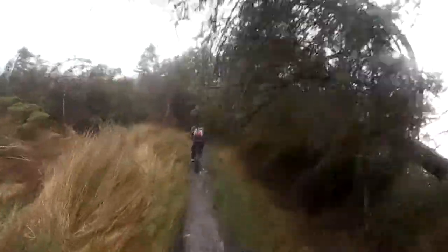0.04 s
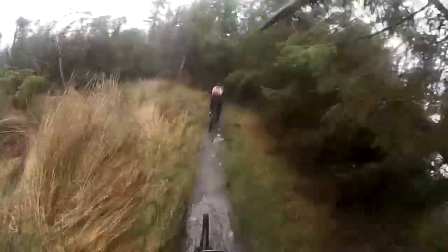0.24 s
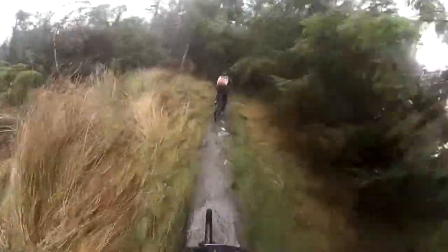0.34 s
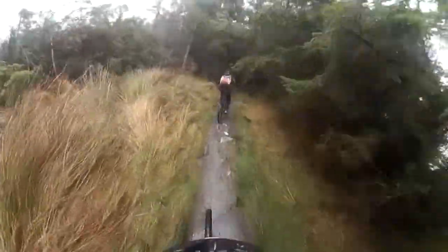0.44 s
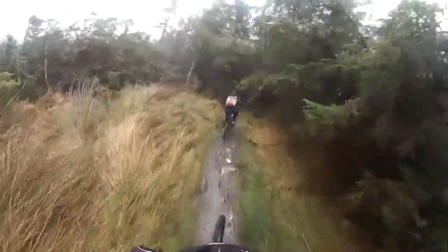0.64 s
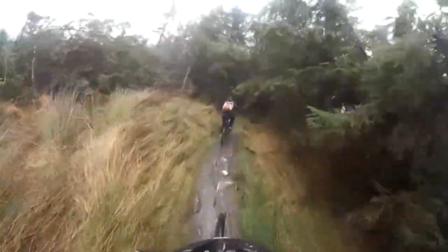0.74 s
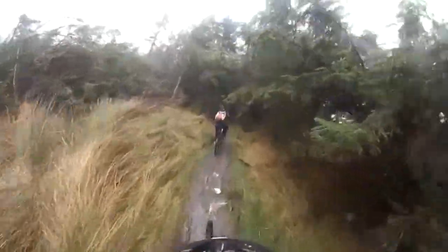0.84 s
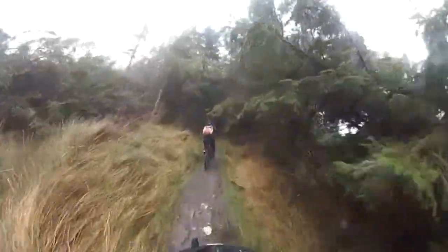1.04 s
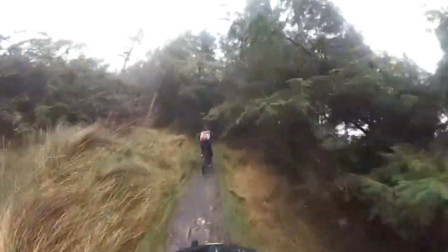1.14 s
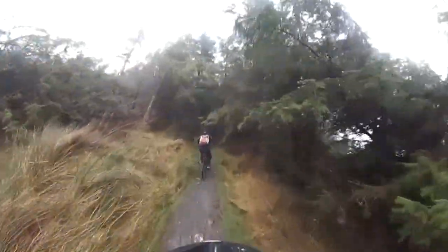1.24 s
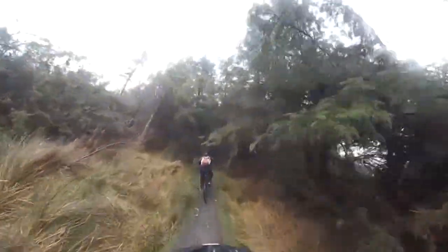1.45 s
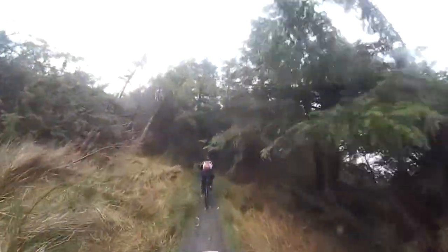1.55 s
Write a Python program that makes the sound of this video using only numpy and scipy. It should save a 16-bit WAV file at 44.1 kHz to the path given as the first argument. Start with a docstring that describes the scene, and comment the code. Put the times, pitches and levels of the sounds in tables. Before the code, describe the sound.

A mountain bike hits a bump with one sharp, ringing knock and a brief clatter of loose parts. Its tyres then crunch faintly along a stony trail, heard close up from an enclosed microphone on board.

```python
"""A stony trail, heard close up from a camera in a closed case riding along on a mountain bike.
The tyres crunch faintly through the case's resonances and swell over small bumps.
One hard jolt rings the bars and mount, sets loose parts clattering for a tenth of a second
and overloads the microphone. The frame rings on, and a few faint pings follow as the bike rolls down."""
import sys
import numpy as np
from scipy import signal
from scipy.fft import rfft, irfft
from scipy.io import wavfile

SR = 44100
rng = np.random.default_rng(int(sys.argv[2]) if len(sys.argv) > 2 else 0)


def digitize_waveform(pressure):
    """Quantize a signal to 16-bit integers and store it at the path in sys.argv[1].

    Rows of a 2-D input are taken as channels; values are limited to [-1, 1].
    """
    field = np.atleast_2d(pressure).T
    bounded = np.clip(field, -1, 1)
    quanta = np.round(bounded * 32767).astype(np.int16)
    wavfile.write(sys.argv[1], SR, quanta)


N = 70560
T = np.arange(N) / SR
RISE_S = 0.00022   # attack of every contact


def from_db(db):
    """Decibels to gain."""
    return 10 ** (np.asarray(db) / 20)


def unit_rms(x):
    """Scale to unit power."""
    return x / np.sqrt(np.mean(x ** 2) + 1e-20)


def at_hz(points, hz):
    """Read a table on a log-frequency axis."""
    table_hz, value = np.transpose(points)
    return np.interp(np.log(hz + 1), np.log(table_hz), value)


def sides(difference):
    """Split a difference: plus half to the left, minus half to the right."""
    return np.array([[.5], [-.5]]) * difference


def stereo_noise(colour, pan, likeness):
    """Steady noise with a given spectrum, balance and left-right likeness."""
    hz = np.fft.rfftfreq(N, 1 / SR)
    mid, side = rfft(rng.standard_normal((2, N)))
    alike = np.clip(at_hz(likeness, hz), -1, 1)
    pair = np.sqrt(1 + alike) * mid + 2 * sides(np.sqrt(1 - alike) * side)
    gain = from_db(at_hz(colour, hz) + sides(at_hz(pan, hz)))
    return unit_rms(irfft(pair * gain, N))


def drift(rate_hz):
    """A smooth random wander of unit power."""
    pole = np.exp(-2 * np.pi * rate_hz / SR)
    wander = signal.lfilter([1], [1, -2 * pole, pole * pole], rng.standard_normal(N + SR))
    return unit_rms(wander[SR:])


def swells(rows):
    """Bell-shaped humps of level."""
    return sum(from_db(db) * np.exp(-.5 * ((T - time) / half) ** 2) for time, half, db in rows)


def decay(age, t60):
    """A quick rise and an exponential fall; silent before the contact."""
    age = np.maximum(age, 0)
    return (1 - np.exp(-age / RISE_S)) * np.exp(-np.log(1000) * age / t60)


# Steady rolling, just below the camera: (time [s], level [dB])
ROLL_LEVEL = [(0, -72.5), (.11, -72.5), (.22, -65), (.37, -65), (.45, -68.5), (.55, -70), (.68, -64),
              (.81, -68), (.98, -65), (1.07, -70.5), (1.22, -65), (1.43, -69.5), (1.6, -67.5)]
# Tyres pressing over bumps, and the thumps of deeper ones: (time [s], half length [s], level [dB])
BUMP_SWELLS = [(0.039, .021, -51), (0.172, 0.019, -52), (0.205, 0.023, -48), (0.417, 0.015, -58.5),
               (.49, 0.012, -59), (0.625, 0.016, -54), (.695, 0.0074, -60), (.75, .012, -62),
               (0.865, 0.015, -61.5), (0.911, 0.017, -63), (1.169, 0.013, -60), (1.319, 0.012, -53),
               (1.495, 0.014, -65.5), (1.584, .016, -48)]
THUMP_SWELLS = [(.02, 0.011, -77), (.655, 0.01, -81), (1.315, 0.011, -76.5), (1.595, .012, -71.5)]
# Rolling, bumps and the mount's thud, heard inside the case: (frequency [Hz], level per Hz [dB])
ROLL_SPECTRUM = [(30, -24), (130, -19), (230, -19), (340, -12), (450, -12.5), (700, -8.5), (1250, 0),
                 (1850, -2), (2150, -12), (3400, -19.5), (4400, -25), (5300, -38), (7500, -37),
                 (10000, -41.5), (15000, -42.5)]
BUMP_SPECTRUM = [(30, -34), (130, -25.5), (230, -18), (340, -6), (450, -11.5), (700, -5.5), (1250, 2.5),
                 (1800, 0.5), (2200, -13), (2900, -17), (3500, -12.5), (4500, -22), (5100, -40),
                 (9000, -54), (15000, -56.5)]
THUD_SPECTRUM = [(30, 0.5), (70, -1), (130, -3.5), (280, 0.5), (500, -7), (1000, -30.5), (4000, -72)]
# Resonances of the case around the microphone: (frequency [Hz], width per filter pass [Hz], level [dB])
CASE_RESONANCES = [(349.1, 35, -17.5), (1826, 150, -4), (2480, 150, -13.5), (3320, 110, -20.5)]
# Where the tyres sit at the microphone: (frequency [Hz], left minus right [dB])
TYRE_PAN = [(100, -2), (380, -5.5), (700, -4), (1300, 1.5), (2400, 2.5), (4200, 15.5), (7000, 2.5),
            (15000, -2)]
# How alike they are on both sides: (frequency [Hz], correlation [0-1])
TYRE_LIKENESS = [(60, 0), (290, .55), (640, .3), (1400, 0.36), (3100, 0.17), (15000, 0.017)]


def tyres():
    """Gritty rolling noise that rings the case and swells over every bump."""
    image = TYRE_PAN, TYRE_LIKENESS
    roll = stereo_noise(ROLL_SPECTRUM, *image)
    drive = stereo_noise(ROLL_SPECTRUM, *image)
    for hz, width, db in CASE_RESONANCES:
        b, a = signal.iirpeak(hz, hz / width, fs=SR)
        case_ring = unit_rms(signal.lfilter(b, a, signal.lfilter(b, a, drive)))
        waver_db = 3 * drift(rate_hz=16)   # each ring comes and goes
        roll = roll + from_db(db + waver_db) * case_ring
    roll_gain = from_db(np.interp(T, *np.transpose(ROLL_LEVEL)))
    bumps = swells(BUMP_SWELLS) * stereo_noise(BUMP_SPECTRUM, *image)
    thumps = swells(THUMP_SWELLS) * stereo_noise(THUD_SPECTRUM, *image)
    grit_db = 1.63 * drift(rate_hz=180)
    return (roll_gain * roll + bumps + thumps) * from_db(grit_db)


# Contacts of the jolt, close to the microphone; each level is a drive, scaled where it is played:
# (time [s], ring [dB], most excited pitch [Hz], rattle [dB], crack [dB], thud [dB])
JOLT_CONTACTS = [(0.231, 6, 1214, -8.5, -21.5, -32), (0.23608, -7.5, 1152, -17.5, -26.5, -42.5),
                 (0.23923, -19, 967, -26.5, -37.5, -50), (0.2492, -8, 1228, -10.5, -26, -38.5),
                 (0.2533, -10, 612.4, -21.5, -42.5, -50), (0.2568, -6, 2058, -15.5, -30, -44.5),
                 (0.2603, -15, 1194, -19.5, -35, -51), (0.2683, -16.5, 1553, -21, -26, -47.5),
                 (0.27273, -15.5, 766, -30.5, -40, -47), (0.27417, -12.5, 784, -32, -44.5, -50),
                 (0.2794, -18, 1749, -17, -19.5, -49.5), (0.301, -28.5, 1368, -30.5, -36, -71.5),
                 (0.3076, -29, 1320, -26.5, -44, -69.5), (0.3117, -28, 1399, -33, -56, -69),
                 (0.33019, -34.5, 1326, -31, -57, -54), (0.33293, -35, 1303, -36, -64, -70)]
# Modes of the bars and mount, right at the camera:
# (frequency [Hz], level [dB], t60 [s], left minus right [dB], left lead [rad])
BAR_MODES = [(273, -34, 0.052, -3, 0), (366, -29.5, 0.061, -6.5, -2.6), (648, -17, 0.078, -4, -0.74),
             (709, -5.5, 0.048, -4, -5), (808, -18.5, 0.067, -0.54, 1.2), (911.7, -2.5, 0.048, 0.13, 0.69),
             (997, -22.5, 0.15, 3, -0.42), (1162, -19, 0.091, -1.5, 3), (1288, -4.5, 0.044, 9.5, 1.47),
             (1390, -10, 0.027, -3.43, -0.54), (1505, -3.5, 0.024, 4, 1.16),
             (1643, -8.5, 0.021, -1.24, -0.63), (1792, -21, 0.024, 3.5, 2), (2440, -11, 0.031, 3.5, 1.5),
             (2658, -22.5, 0.055, 4, 0.43), (3207, -5, 0.021, 10.5, 4.5), (3330, -15, 0.056, 7, 1.26)]


def bars_and_mount(drive_db=4, focus_db=12.0, focus_octaves=0.5, spread_db=0.2):
    """Every contact rings the same modes, those near its own pitch the most."""
    out, length = np.zeros((2, N)), SR // 6
    hz, level_db, t60, pan_db, lead = np.transpose(BAR_MODES)
    poles = 2j * np.pi * hz - np.log(1000) / t60
    modes = np.exp(poles[:, None] * T[:length])
    placement = from_db(sides(pan_db)) * np.exp(1j * sides(lead))
    attack = 1 - np.exp(-T[:length] / RISE_S)
    for time, ring_db, pitch, *_ in JOLT_CONTACTS:
        nearness = np.exp(-.5 * (np.log2(hz / pitch) / focus_octaves) ** 2)
        scatter_db = spread_db * rng.standard_normal(len(hz))
        strength = from_db(drive_db + ring_db + level_db + focus_db * (nearness - 1) + scatter_db)
        start = int(time * SR) + 1
        advance = np.exp(poles * (start / SR - time))   # contacts fall between samples
        ring = (placement * strength * advance) @ modes
        out[:, start:start + length] += ring.imag * attack
    return out


# Many small modes of loose parts, and a hard contact's crack: (frequency [Hz], level per Hz [dB])
RATTLE_SPECTRUM = [(30, -45), (150, -33.5), (300, -16), (500, -19), (750, -2), (1600, 0), (2100, -10),
                   (2800, -13), (3400, -10), (4300, -13.5), (5000, -32), (9000, -48), (15000, -60)]
CRACK_SPECTRUM = [(30, -41.5), (500, -20), (2000, -7.5), (4000, 3.5), (5200, -6), (6800, -1), (9000, -7.5),
                  (10300, -21.5), (15000, -27)]
# Where the clatter sits at the microphone: (frequency [Hz], left minus right [dB])
CLATTER_PAN = [(100, 0), (350, -6.5), (700, -2.5), (1300, -0.5), (2400, 4.5), (4400, 9.5), (8000, 8),
               (15000, 4.5)]
# How alike it is on both sides: (frequency [Hz], correlation [0-1])
CLATTER_LIKENESS = [(60, .6), (300, 0.1), (1200, .6), (2200, 0.9), (4000, 0.08), (15000, 0)]


def clatter(rattle_t60_s=.04, crack_t60_s=.03, thud_t60_s=.063):
    """Each contact rattles the loose parts, cracks brightly and thuds through the mount."""
    times, _, _, rattle_db, crack_db, thud_db = np.transpose(JOLT_CONTACTS)
    thud_db = thud_db.max() + 1.5 * (thud_db - thud_db.max())   # soft contacts thud less than their share
    layers = ((RATTLE_SPECTRUM, rattle_t60_s, rattle_db),
              (CRACK_SPECTRUM, crack_t60_s, crack_db),
              (THUD_SPECTRUM, thud_t60_s, thud_db))
    age = T[:SR // 4]
    shudder = from_db(-19.5) * decay(age, t60=.1)   # the frame adds a weak tail
    out = 0
    for spectrum, t60, levels_db in layers:
        envelope = decay(age, t60) + shudder
        power = np.zeros(N)
        for start, db in zip((times * SR).astype(int), levels_db):
            power[start:start + len(envelope)] += (from_db(db) * envelope) ** 2
        out = out + np.sqrt(power) * stereo_noise(spectrum, CLATTER_PAN, CLATTER_LIKENESS)
    return out


# The frame after the jolt, then loose parts further down the trail, all faint and centred:
# (time [s], frequency [Hz], level [dB], t60 [s])
FRAME_TONES = [(.307, 732, -32.5, 0.079), (0.305, 1347, -27, .08), (.331, 195.1, -70, 0.18),
               (.331, 358, -51.5, 0.13), (0.248, 2490, -59.5, 0.48), (.249, 3950, -56.5, 0.3)]
LOOSE_PINGS = [(.519, 1802, -51.5, .04), (0.595, 1844, -51.5, 0.22), (.928, 620, -56.5, 0.076),
               (1.002, 1047, -61, .06)]


def frame_and_pings():
    """The frame rings on and now and then a loose part pings, each as one dying sine."""
    return sum(from_db(db) * decay(T - time, t60) * np.sin(2 * np.pi * hz * (T - time))
               for time, hz, db, t60 in FRAME_TONES + LOOSE_PINGS)


def scene():
    """The rolling bike and its one jolt, heard from on board."""
    jolt = bars_and_mount() + clatter()
    return tyres() + jolt + frame_and_pings()


def record(dry, bass_cut_hz=46, overload_knee=4.0, case_cut_hz=6200, top_hz=16800):
    """The camera in its case thins the bass, flattens peaks at full scale, then dulls and cuts the top."""
    thin = signal.sosfilt(signal.butter(1, bass_cut_hz, "high", fs=SR, output="sos"), dry)
    clipped = thin / (1 + np.abs(thin) ** overload_knee) ** (1 / overload_knee)
    dull = signal.sosfilt(signal.butter(1, case_cut_hz, fs=SR, output="sos"), clipped)
    return signal.sosfilt(signal.cheby2(12, 70, top_hz, fs=SR, output="sos"), dull)


dry = scene()
out = record(dry)
digitize_waveform(out)
```